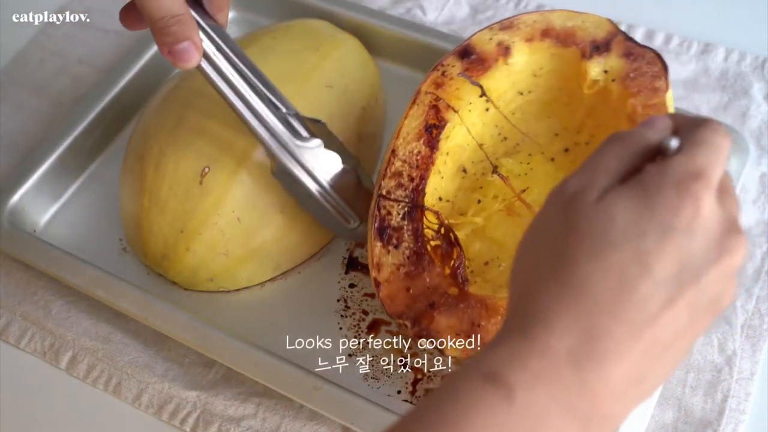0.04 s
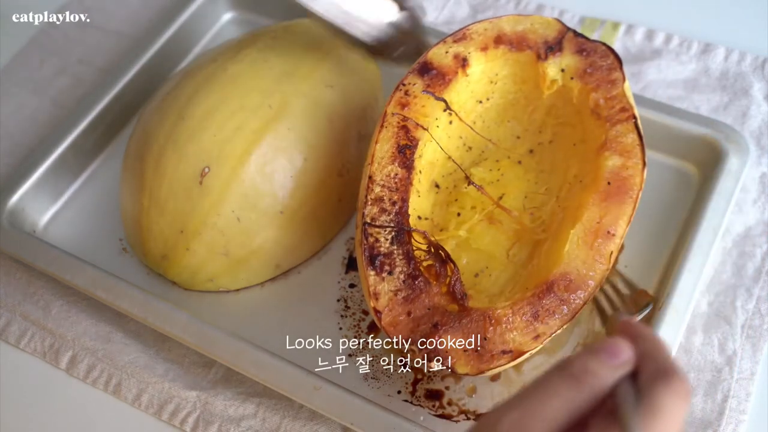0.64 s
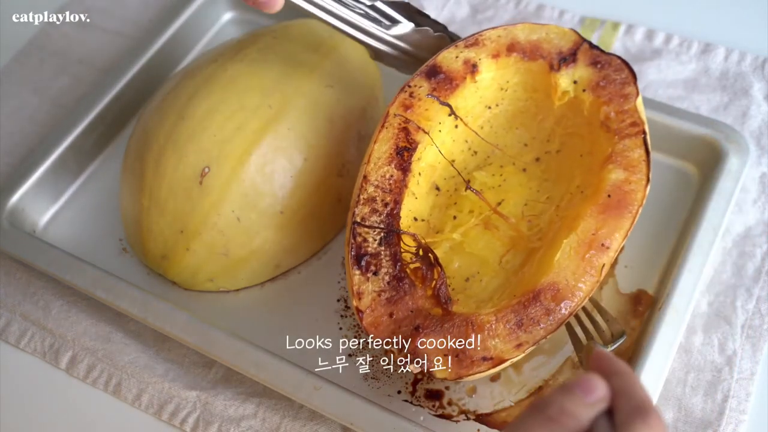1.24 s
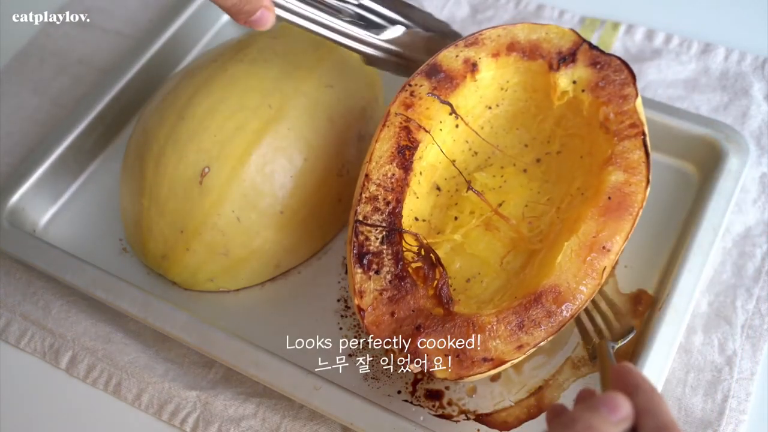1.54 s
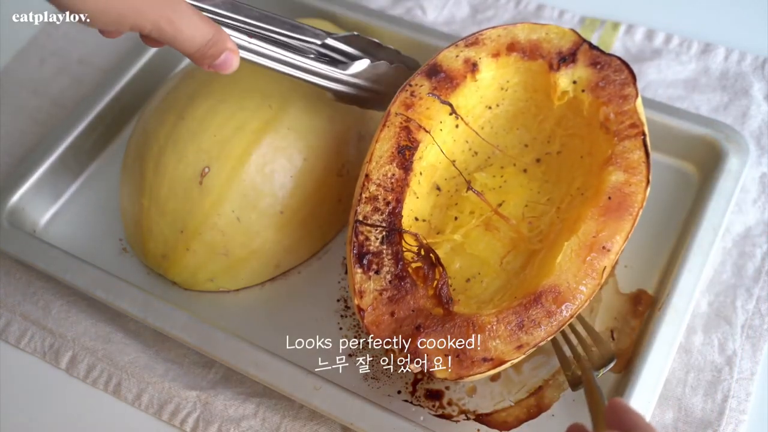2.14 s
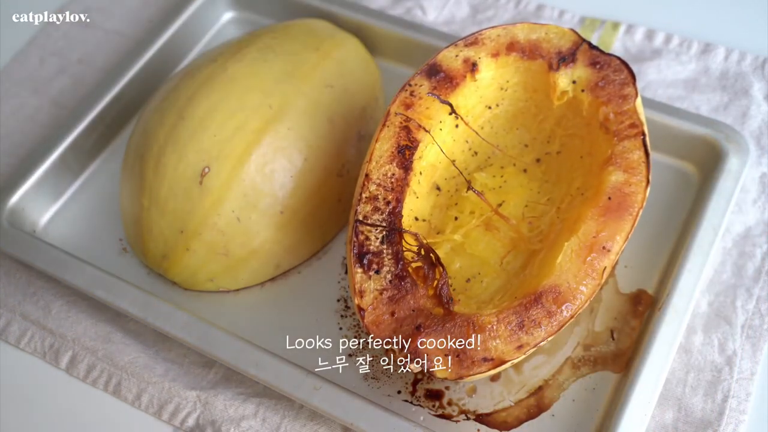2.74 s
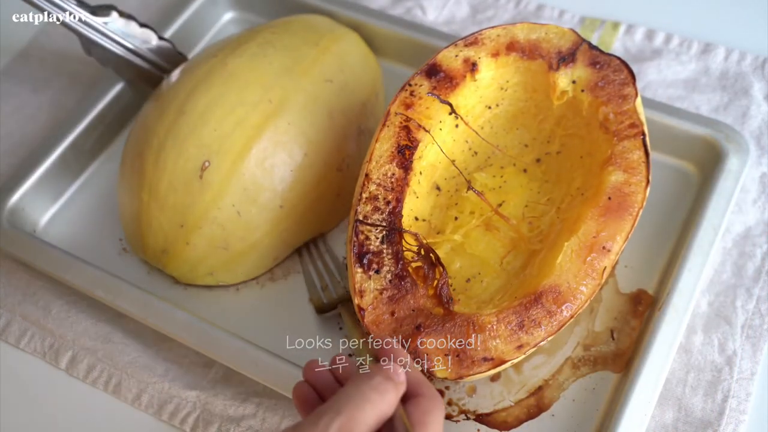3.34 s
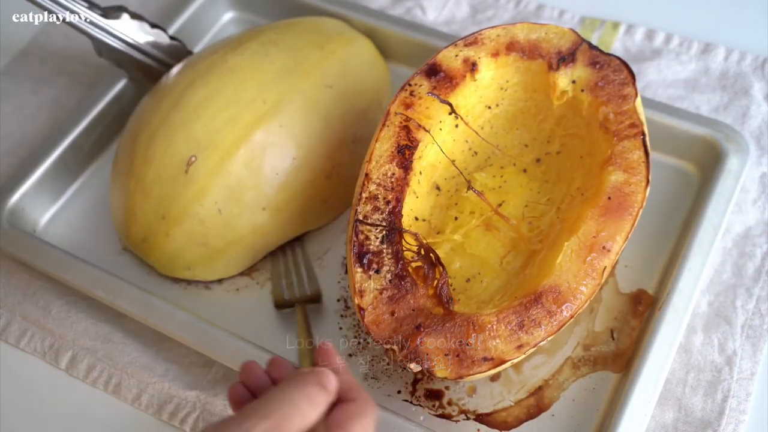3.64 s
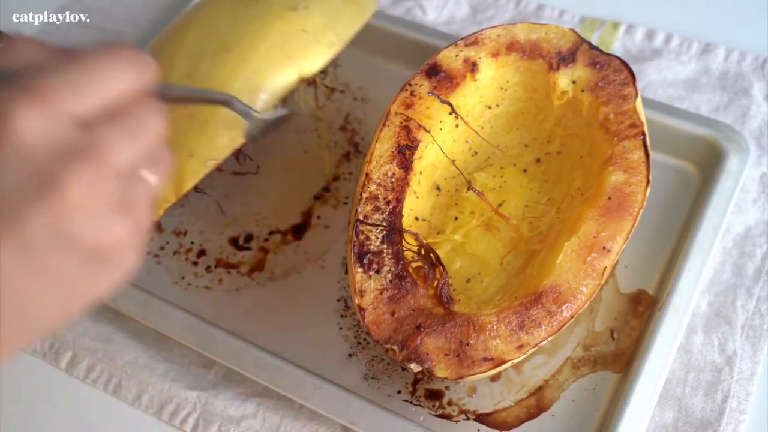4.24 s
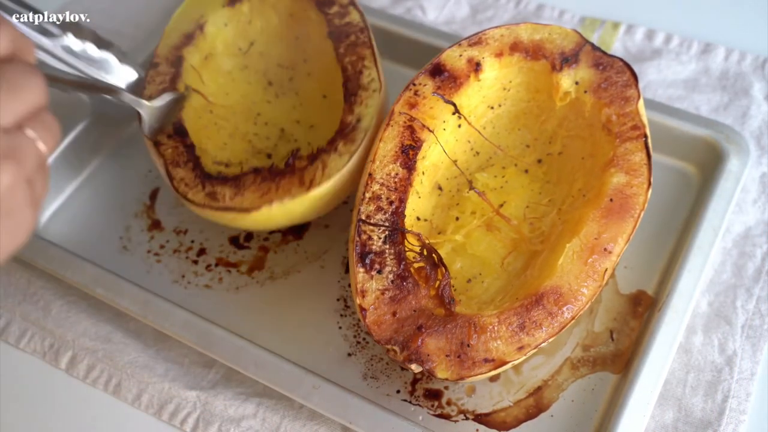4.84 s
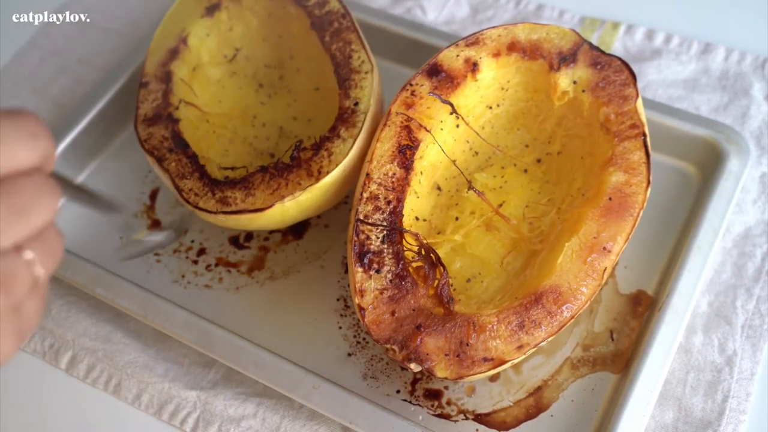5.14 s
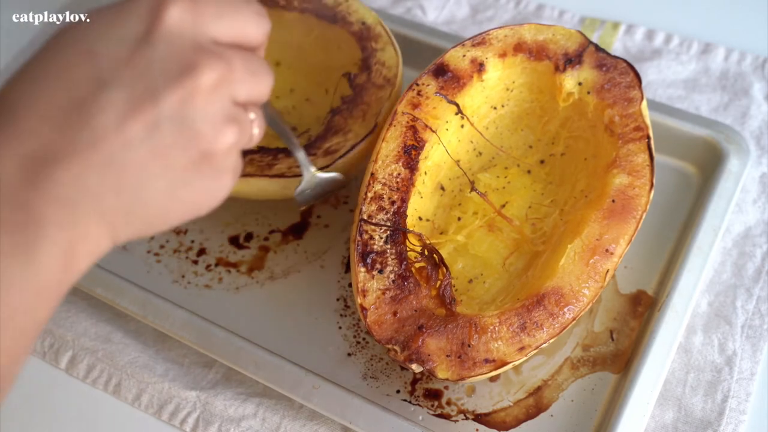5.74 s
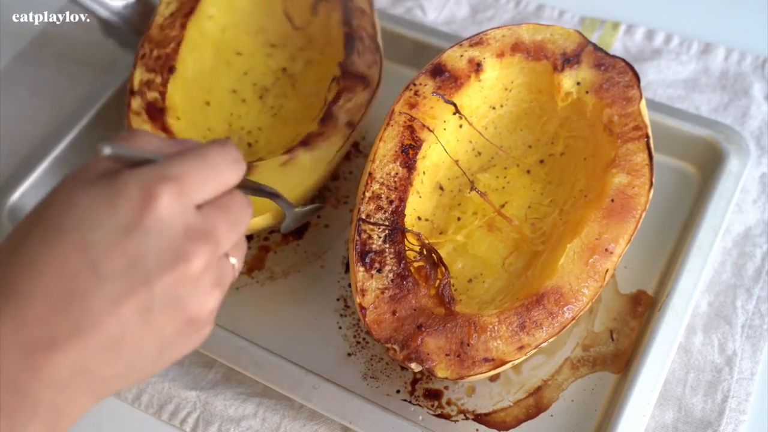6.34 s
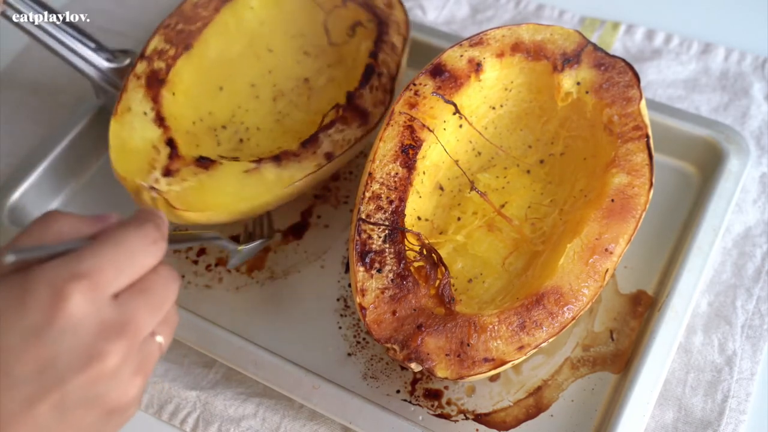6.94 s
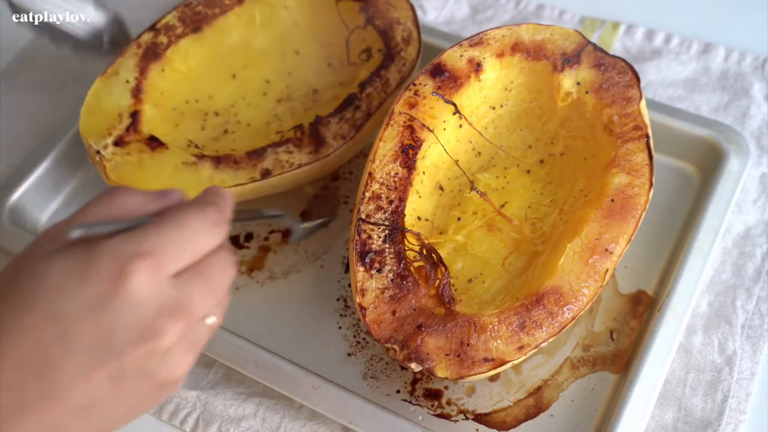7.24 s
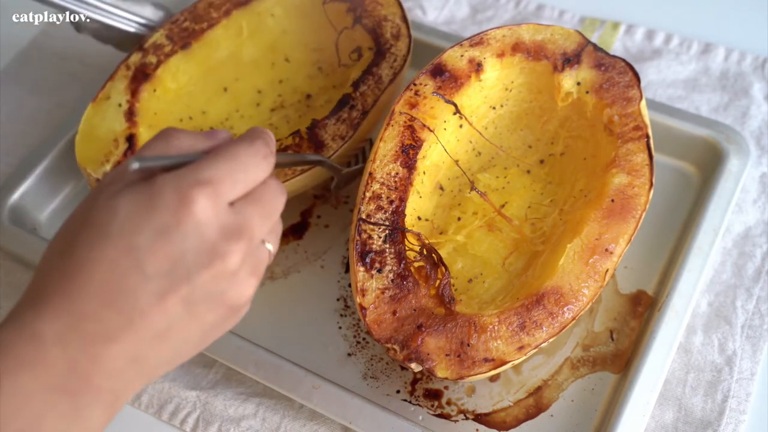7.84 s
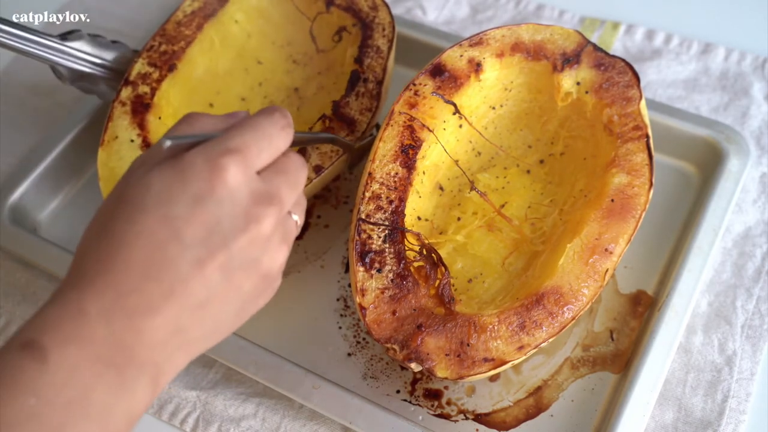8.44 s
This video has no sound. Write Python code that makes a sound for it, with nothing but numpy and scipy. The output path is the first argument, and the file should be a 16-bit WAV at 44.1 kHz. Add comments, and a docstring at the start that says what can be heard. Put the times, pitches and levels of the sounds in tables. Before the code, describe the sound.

Steel tongs and a fork click, clank and scrape on a metal baking tray as a wet roasted squash half is flipped.

```python
"""Steel clicks, clanks and scrapes on a metal baking tray as roasted squash halves are turned over. Tongs click
and chirp, and drag across the tray in stick-slip jerks; a fork strikes the tray, skids and squeaks under load.
Each metal piece rings with a few clear modes over a dense, fast-dying clash. The wet squash slides with a
sticky fizz and flops over, thumping tray and table. A short kitchen echo follows the clatter, and a low room
rumble lies under it all."""
import sys
import numpy as np
from scipy import signal
from scipy.fft import rfft, irfft
from scipy.io import wavfile
from scipy.ndimage import uniform_filter1d

SR = 44100
rng = np.random.default_rng(int(sys.argv[2]) if len(sys.argv) > 2 else 0)


def bounce(signal):
    """Save signal as a 16-bit WAV file at the path given by the first command-line argument."""
    frames = np.transpose(np.atleast_2d(signal))
    limited = np.clip(frames, -1, 1)
    pcm = np.round(limited * 32767).astype(np.int16)
    wavfile.write(sys.argv[1], SR, pcm)


N = 379258
TIME = np.arange(N) / SR
RING_TIME = TIME[:SR // 2]


def from_db(db):
    """Decibels to gain."""
    return 10 ** (np.asarray(db) / 20)


def rms(x):
    """Root mean square."""
    return np.sqrt(np.mean(x ** 2) + 1e-20)


def unit_energy(x):
    """Scale a response so that it passes noise at unchanged level."""
    return x / np.linalg.norm(x)


def add(track, start_s, sound):
    """Mix a sound into the track at a time."""
    start = max(round(start_s * SR), 0)
    track[start:start + len(sound)] += sound[:N - start]


def decay(t60_s):
    """Envelope that falls 60 dB in t60_s."""
    return np.exp(-np.log(1000) * RING_TIME / t60_s)


def damped_sine(hz, t60_s):
    """One ringing mode."""
    return np.sin(2 * np.pi * hz * RING_TIME) * decay(t60_s)


def movement(start_s, swell_s, hold_s, release_s, curve=1.84):
    """Envelope of one smooth gesture."""
    end_s = start_s + swell_s + hold_s + release_s
    ramps = np.minimum((TIME - start_s) / swell_s, (end_s - TIME) / release_s)
    return np.clip(ramps, 0, 1) ** curve


def shaped(x, spectrum):
    """Colour a noise with an EQ curve; rms 1."""
    hz, db = np.transpose(spectrum)
    bins = np.maximum(np.fft.rfftfreq(len(x), 1 / SR), 1)
    gain = from_db(np.interp(np.log(bins), np.log(hz), db))
    coloured = irfft(rfft(x) * gain, len(x))
    return coloured / rms(coloured)


def whitened(x):
    """Keep the timing of a burst but spread its energy evenly over all pitches."""
    return irfft(np.exp(1j * np.angle(rfft(x))), len(x))


def emphasis(x, db, hz, kind):
    """Boost or cut one region of the spectrum."""
    b, a = signal.butter(1, hz, kind, fs=SR)
    boost = a + (from_db(abs(db)) - 1) * b
    return signal.lfilter(boost, a, x) if db > 0 else signal.lfilter(a, boost, x)


def narrow_noise(hz, width_hz):
    """Noise in one narrow resonance; rms 1."""
    bins = np.fft.rfftfreq(N, 1 / SR)
    band = irfft(rfft(rng.standard_normal(N)) / (1 + ((bins - hz) / width_hz) ** 2), N)
    return band / rms(band)


def wander(samples):
    """Random drift: noise smoothed over so many samples; rms 1."""
    drift = uniform_filter1d(rng.standard_normal(len(RING_TIME)), size=samples)
    return drift / rms(drift)


def slips(size, per_s, spread_db):
    """Stick-slip friction: tiny jerks of random time, size and sign; rms 1."""
    signs = rng.choice([-1, 1], size)
    strengths = from_db(spread_db * np.minimum(rng.exponential(1, size), 4))
    jerks = signs * strengths * (rng.random(size) < per_s / SR)
    return jerks / rms(jerks)


def metal_body(modes, clash_eq, clash_db, clash_t60_s):
    """Impulse response of a metal piece: clear modes over a clash, a crowd of fast-dying ones."""
    ring = sum((-1) ** k * from_db(db) * unit_energy(damped_sine(hz, t60_s))
               for k, (hz, db, t60_s) in enumerate(modes))
    fade = decay(clash_t60_s)
    clash = rng.standard_normal(len(RING_TIME)) * fade
    for _ in range(2):
        clash = shaped(whitened(clash), clash_eq) * np.minimum(10 * fade, 1)
    return unit_energy(unit_energy(ring) + from_db(clash_db) * unit_energy(clash))


def touch_colour(x, bass_db, middle_db, treble_db):
    """The place and hardness of a contact favour low, middle or high modes."""
    x = emphasis(x, bass_db, 950, "low")
    x = emphasis(x, middle_db, [1250, 1950], "band")
    return unit_energy(emphasis(x, treble_db, 5200, "high"))


def rubbed(response, length_s, swell_s, judder_db=0.2):
    """Rubbed metal: pressure builds, the edge catches and slips, then lifts off."""
    touching = np.clip((length_s - RING_TIME) / 0.0027 + 1, 0, 1)
    pressure = np.clip(RING_TIME / swell_s, 0, 1) * touching
    catches = from_db(judder_db * wander(130))
    jerks = pressure * catches * slips(len(RING_TIME), per_s=3500, spread_db=1.0)
    force = whitened(jerks) * touching   # the jerks reach every mode alike
    ringing = signal.fftconvolve(force, response)[:len(response)]
    return unit_energy(ringing) * np.linalg.norm(pressure)


def strokes(rows, response, swell_share):
    """Short rubs that swell over a share of their length and break off."""
    out = np.zeros(N)
    for start_s, length_s, level_db, *treble_db in rows:
        spot = touch_colour(response, 0, 0, *treble_db) if treble_db else response
        add(out, start_s, from_db(level_db) * rubbed(spot, length_s, swell_share * length_s))
    return out


def contact(response, knock_db, skid_s, skid_db, favoured_hz, boost_db, *colour):
    """A knock that runs into a short skid, both coloured by the spot touched."""
    favoured = emphasis(response, boost_db, [favoured_hz * .92, favoured_hz / .92], "band")
    spot = touch_colour(favoured, *colour)
    knock = spot / rms(spot[:SR // 200])   # the first 5 ms set the level
    return from_db(knock_db) * knock + from_db(skid_db) * rubbed(spot, skid_s, swell_s=0.00032)


def dragged(curve, response, dull_hz, bright_hz, bright_db, judder_db, edge_s=0.00098, travel=0.27):
    """Steel catches and slips along the sheet; the echo from its edge shifts as the contact travels."""
    times_s, level_db, brightness_db = np.transpose(curve)
    t = times_s[0] + RING_TIME
    catches = from_db(judder_db * wander(130))
    path = uniform_filter1d(wander(4000), size=800)
    jerks = whitened(slips(len(t), per_s=3000, spread_db=3) * catches)
    echo_delay_s = edge_s * (1 + travel * path)
    jerks = jerks + 0.38 * np.interp(t - echo_delay_s, t, jerks)
    force = jerks / rms(jerks) * from_db(np.interp(t, times_s, level_db)) * (t < times_s[-1])
    bright_force = force * from_db(np.interp(t, times_s, brightness_db) + bright_db)
    dull_band = signal.butter(2, dull_hz, "band", fs=SR, output="sos")
    bright_band = signal.butter(3, bright_hz, "high", fs=SR, output="sos")
    dull = signal.fftconvolve(force, unit_energy(signal.sosfilt(dull_band, response)))
    bright = signal.fftconvolve(bright_force, unit_energy(signal.sosfilt(bright_band, response)))
    return dull + bright + from_db(-10) * signal.fftconvolve(force, response)


def room_tone(rumble_db=-41.5, hum_db=-49.5):
    """A bed of rumble with low resonances, thinning to faint hiss; a low hum swells briefly."""
    # Colour of the rumble: frequency_hz, gain_db
    rumble_eq = [(12, -50), (20, -15.5), (58, 2.5), (98, -6), (216, -14.5), (248, -13.5), (337, -29.5),
                 (434, -22.5), (472, -28), (607, -26.5), (660, -26.5), (2460, -42.5), (2910, -46),
                 (3840, -47.5), (16000, -51)]
    # Low resonances in it: pitch_hz, width_hz, level_db
    resonances = [(28, 3, -54.5), (52, 11, -47.5), (80.4, 11, -55.5), (161.5, 39, -61.5), (262.7, 74, -57)]
    rumble = from_db(rumble_db) * shaped(rng.standard_normal(N), rumble_eq)
    drone = sum(from_db(db) * narrow_noise(hz, width_hz) for hz, width_hz, db in resonances)
    swell = movement(start_s=0.77, swell_s=0.21, hold_s=0.51, release_s=0.31)
    hum = from_db(hum_db) * swell * narrow_noise(hz=161, width_hz=12)
    return rumble + drone + hum


def kitchen_echo(x, t60_s=0.35, build_s=0.0075):
    """Diffuse reflections that build up quickly and die away."""
    # Colour of the reflections: frequency_hz, gain_db
    echo_eq = [(100, 0.5), (1000, -2), (4500, -2.5), (9000, -3.5), (16000, -8.5)]
    envelope = decay(t60_s) * (1 - np.exp(-RING_TIME / build_s))
    tail = shaped(rng.standard_normal(len(RING_TIME)), echo_eq) * envelope
    return signal.fftconvolve(x, unit_energy(tail))[:N]


def squash_sliding(waver_db=1.0):
    """The cut face rubs unevenly over the tray while the sticky juice tears in tiny bursts."""
    # Shoves that gather speed, glide and stop: start_s, swell_s, glide_s, release_s, rub_db, fizz_db
    shoves = [(-.2, 0.36, 0.14, .08, -53.5, -64), (2.951, 0.062, 0.015, 0.11, -45, -55.5),
              (3.08, 0.062, 0.079, 0.1, -45, -53), (3.24, 0.086, 0.19, 0.093, -57.5, -66.5),
              (3.488, 0.14, 0.017, .14, -33.5, -40), (3.74, 0.15, .04, 0.046, -40.5, -52.5),
              (3.94, 0.053, .19, 0.35, -38, -54.5), (4.331, 0.12, 0.25, 0.27, -47.5, -46),
              (5.48, 0.16, 0.13, 0.66, -53.5, -63), (6.0, 0.19, 0.11, 0.064, -55, -70)]
    # Colours of the rub and the wet fizz: frequency_hz, gain_db
    rub_eq = [(150, -20), (350, -1), (600, 2), (1400, 4.5), (2200, 0), (3200, -3), (4600, -5), (6500, -26),
              (10000, -25.5)]
    fizz_eq = [(2500, -41), (5000, -0.5), (7000, -3), (10000, -7.5), (16000, -6)]
    rub = shaped(slips(N, per_s=3000, spread_db=2.0), rub_eq)
    fizz = shaped(slips(N, per_s=4000, spread_db=4.0), fizz_eq)
    grip = from_db(waver_db * narrow_noise(hz=0, width_hz=37))
    return grip * sum(movement(*timing) * (from_db(rub_db) * rub + from_db(fizz_db) * fizz)
                      for *timing, rub_db, fizz_db in shoves)


def squash_thumps(octave_off_db=-14, attack_s=0.0041):
    """The soft, heavy half shakes tray and table, most of all the modes near its landing's pitch."""
    # The squash lands and rocks, lower in pitch when softer: start_s, strength_db, pitch_hz
    landings = [(4.641, -11, 73.2), (4.694, -20.5, 26.2), (5.442, -28.5, 26.5), (5.675, -28.5, 44.7),
                (5.714, -34, 27), (7.071, -28, 48.3), (7.56, -23.5, 120)]
    # Tray and table under its weight: pitch_hz, gain_db, t60_s
    table_modes = [(27.4, 2.5, 0.23), (45.5, 2, 0.35), (109, 1, 0.11), (166, 6, 0.059)]
    attack = 1 - np.exp(-RING_TIME / attack_s)
    out = np.zeros(N)
    for start_s, strength_db, pitch_hz in landings:
        for hz, mode_db, t60_s in table_modes:
            gain = from_db(strength_db + mode_db + octave_off_db * np.log2(hz / pitch_hz) ** 2)
            add(out, start_s, gain * damped_sine(hz, t60_s) * attack)
    return out


def tongs(bass_db=-7, middle_db=-6, skid_s=0.0034, skid_below_db=4):
    """The steel arms click and rub on the rind; their joint chirps thinly as they flex."""
    # The arms' short clack and faint ring, and the joint's modes: pitch_hz, energy_db, t60_s
    arm_modes = [(1110, -3, 0.037), (2297, 8, 0.018), (2240, -12, .07), (2745, -7, 0.053), (3883, 6, 0.014),
                 (3880, -6, .12), (4350, -9, 0.017), (5010, -2, 0.022), (5000, -9, .11), (6920, -16, 0.026),
                 (8250, -9, 0.043)]
    joint_modes = [(3800, -7, 0.087), (7740, -5, 0.026), (9100, -3, .03), (11800, 1, .015)]
    # Colour of their clash: frequency_hz, gain_db
    clash_eq = [(300, -57), (1000, 19.5), (1500, 11.5), (2300, 6), (3000, -9), (4000, 3.5), (5800, -2),
                (8000, -6.5), (10000, -13.5), (16000, -18)]
    # Rubs on the rind and chirps of the joint: start_s, length_s, level_db
    rubs = [(1.36, 0.33, -68), (4.91, 0.072, -60.5), (7.77, 0.14, -61), (8.02, 0.16, -64.5)]
    chirps = [(.643, 0.015, -57.5), (.722, 0.016, -56.5), (.775, .023, -60.5), (5.89, 0.24, -63),
              (6.155, 0.14, -57.5)]
    # Clicks of the arms: start_s, level_db, favoured_hz, boost_db, treble_db
    clicks = [(.3617, -56, 3700, 5, 13), (0.8899, -30.5, 2340, 9.5, 4), (2.678, -56, 4400, 10, 3),
              (2.7346, -49, 4300, 5, -7), (2.8710, -46.5, 2750, 17, -7), (4.8855, -48, 3050, 9, -16),
              (5.4, -47, 1950, 11, 14), (5.4432, -30.5, 4860, 1.5, 7.5), (7.5212, -27.5, 2480, 13, 18),
              (7.561, -30, 3700, -2.5, 9), (7.7005, -54.5, 4000, -11, 6), (8.34, -57, 2400, 3.5, 10.5)]
    arms = metal_body(arm_modes, clash_eq, clash_db=2, clash_t60_s=0.02)
    joint = metal_body(joint_modes, clash_eq, clash_db=3.5, clash_t60_s=.012)
    out = strokes(rubs, arms, swell_share=.25) + strokes(chirps, joint, swell_share=0.13)
    for start_s, level_db, favoured_hz, boost_db, treble_db in clicks:
        click = contact(arms, level_db, skid_s, level_db - skid_below_db,
                        favoured_hz, boost_db, bass_db, middle_db, treble_db)
        add(out, start_s, click)
    return out


def tray(pressed_ring_share=0.43):
    """The sheet is knocked and scraped; it rings shorter under the pressing tongs."""
    # Modes of the sheet: pitch_hz, energy_db, t60_s
    modes = [(430, -21, .1), (720, -16, .08), (942, -11, .1), (1070, -11, .06), (1315, -7, .1),
             (1430, -8, .08), (1541, 0, .14), (1692, -3, .1), (1860, -2, .11), (2020, -8, .08),
             (2159, -3, .09), (2328, -4, .11), (2405, -5, .12), (2457, -6, .12), (2559, -2, .14),
             (2720, -7, .1), (2949, -6, .08), (3161, -8, .09), (3850, -10, .12), (4400, -12, .07),
             (4920, -9, .05), (5860, -15, .07), (6730, -13, .06), (7300, -16, .04), (9100, -19, .07)]
    # Colour of its clash: frequency_hz, gain_db
    clash_eq = [(150, -34.5), (380, -0.5), (560, -8), (800, 0.5), (1500, 4.5), (2100, -2.5), (2700, -3),
                (3500, -0.5), (5000, -7), (6000, -16.5), (7500, -19.5), (10000, -26.5), (16000, -29.5)]
    # Knocks: start_s, knock_db, skid_s, skid_db, favoured_hz, boost_db, bass_db, middle_db, treble_db
    knocks = [(0.865, -37.5, .002, -56, 4400, 1, 6, -1, 8),
              (1.9263, -43, 0.00063, -38.5, 1030, 20, 3, -2, 25),
              (3.6278, -17.5, 0.0022, -36, 417, 10.5, 4, -24.5, 7),
              (4.0074, -11.5, .002, -22, 2810, 5.6, 2, 11, 11.5),
              (5.6734, -41, 0.02, -45, 1010, 12.5, 10, -1, 9),
              (6.663, -35, 0.0072, -36, 3800, -7, 11, -1, 17),
              (6.6690, -34, 0.0064, -25, 3960, 6, -2.5, -4, 1.5),
              (7.0119, -27, 0.0127, -26, 990, 6, -2.5, 5, 7)]
    # The tongs drag to flip the squash, later to push it: time_s, relative_level_db, brightness_db
    flip_drag = [(4.016, -20, -8), (4.022, -21, -5.5), (4.18, -26, 1.5), (4.21, -33.5, -6),
                 (4.25, -48, 2.5)]
    push_drag = [(6.69, -39, -12), (6.708, -39, -6), (6.724, -23, -8.5), (6.76, -32.5, -12),
                 (6.78, -23, -9.5), (6.822, -38.5, -10), (6.844, -21, -10), (6.882, -18, -5),
                 (6.936, -25, -3.5), (6.946, -22, -2), (6.975, -37, -16)]
    pressed_modes = [(hz, db, t60_s * pressed_ring_share) for hz, db, t60_s in modes]
    pressed = metal_body(pressed_modes, clash_eq, clash_db=4, clash_t60_s=.018)
    struck = metal_body(modes, clash_eq, clash_db=10, clash_t60_s=.012)
    out = np.zeros(N)
    for start_s, *blow in knocks:
        add(out, start_s, contact(struck, *blow))
    flip = dragged(flip_drag, pressed, dull_hz=(1150, 3200), bright_hz=5000, bright_db=1.5, judder_db=-1)
    push = dragged(push_drag, pressed, dull_hz=(1310, 2950), bright_hz=4120, bright_db=1, judder_db=2.2)
    add(out, flip_drag[0][0], from_db(-5.0) * flip)
    add(out, push_drag[0][0], from_db(-1.5) * push)
    return out


def fork():
    """The fork clanks on the tray, skids on its tine tips and squeaks under load."""
    # Modes of the whole fork, the tines and the loaded tines: pitch_hz, energy_db, t60_s
    fork_modes = [(430, -20, .08), (735, -17, .08), (900, -9, .04), (945, -4, .13), (1090, -11, .06),
                  (1345, -8, .07), (1470, -12, .07), (2560, -8, .1), (2850, -8, .07), (3030, -7, .05),
                  (3165, -6, .07), (3677, -13, .1), (4054, -11, .08), (4400, -11, .06), (4900, -8, .06),
                  (5630, -17, .07), (6250, -16, .05), (8100, -17, .055)]
    tine_modes = [(930, -5, 0.11), (1320, -13, 0.078), (1434, 4, 0.029), (1370, -9, 0.12),
                  (1690, -3.5, .09), (2230, -7, 0.046), (2430, -6.5, 0.12), (3750, 1.5, 0.13),
                  (4520, -1, 0.1), (5130, -22.5, 0.11), (5300, -46.5, .06), (6600, 3.5, 0.042),
                  (8400, -1.5, 0.07), (9560, 0.5, .04)]
    squeak_modes = [(596, -9.5, .04), (990, -2, .06), (1220, -5.5, 0.015), (2900, -8, .03),
                    (5260, -4, .025), (7070, -5.5, .016), (10900, -9, .006)]
    # Clash colours of fork and tines: frequency_hz, gain_db
    fork_clash_eq = [(150, -17), (340, -15.5), (520, -5), (680, -12.5), (950, 2.5), (1400, 1),
                     (1700, -12.5), (2100, -12), (2600, 4.5), (3200, -2.5), (4700, -0.5), (5600, -8.5),
                     (8000, -8), (10500, -17.5), (16000, -15.5)]
    tine_clash_eq = [(200, -28.5), (800, -8.5), (1300, 1), (2000, -10.5), (2500, 3), (3000, -6), (4500, 3),
                     (7000, -4), (11000, -9), (16000, -8)]
    # Short rubs on rind and tray: start_s, length_s, level_db, treble_db
    rubs = [(4.298, 0.041, -34, -1), (4.57, 0.1, -39.5, 4), (4.675, 0.079, -36, -4),
            (6.157, 0.02, -46.5, 10), (6.300, 0.0154, -46, -4), (6.533, 0.027, -40, -4),
            (7.036, 0.0087, -37, -3)]
    # Tines squeak as they lever the squash up: start_s, length_s, level_db
    squeaks = [(3.893, 0.035, -35.5), (3.951, 0.074, -29), (3.969, 0.008, -24)]
    # Clanks: start_s, knock_db, skid_s, skid_db, favoured_hz, boost_db,
    # bass_db, middle_db, treble_db, tip_share (0-1, the part taken by the tine tips)
    clanks = [(3.1760, -21.5, 0.0037, -48, 5370, 9.5, 19, 10, 7, 0.44),
              (3.2030, -20.5, 0.0051, -31.5, 5030, 7.4, 13, 2.5, -22.5, 0.92),
              (4.4955, -16.5, 0.011, -18.5, 3060, 6, -0.5, -2.5, -9.5, 0.2),
              (6.0585, -25.5, 0.021, -25, 1750, 15.5, 2.5, -3, -4, 1),
              (6.3775, -23.5, 0.014, -22, 883, 10, 2.5, -2, 6.5, 0.07),
              (6.4622, -22, 0.00085, -17.5, 960, 12, 1.5, -4, -1, 0.2),
              (6.4980, -24.5, .003, -47, 4300, 3, 11, 5, 7, 0.03),
              (7.1770, -20.5, 0.035, -27, 920, 4.5, 2, -6, -1, 0.27),
              (7.2535, -25, .023, -23, 6720, -0.5, 6.5, 14, 10.5, 1)]
    whole = metal_body(fork_modes, fork_clash_eq, clash_db=2.0, clash_t60_s=0.018)
    tines = metal_body(tine_modes, tine_clash_eq, clash_db=4.5, clash_t60_s=0.031)
    loaded_tines = metal_body(squeak_modes, tine_clash_eq, clash_db=-5.5, clash_t60_s=0.006)
    rubbing = touch_colour(whole, bass_db=-8, middle_db=3.5, treble_db=-4.5)
    out = strokes(rubs, rubbing, swell_share=0.35) + strokes(squeaks, loaded_tines, swell_share=.025)
    for start_s, *blow, tip_share in clanks:
        response = (1 - tip_share) * whole + tip_share * tines
        add(out, start_s, contact(response, *blow))
    return out


def scene(echo_db=-13):
    """Close, mono clatter and sliding with a little echo, over dry thumps and the room tone."""
    near = tray() + fork() + tongs() + squash_sliding()
    return (near + from_db(echo_db) * kitchen_echo(near) + squash_thumps() + room_tone())[None]


def record(dry, cutoff_hz=16100):
    """A steep low-pass takes off the very top."""
    return signal.sosfilt(signal.ellip(12, .1, 80, cutoff_hz, fs=SR, output="sos"), dry)


dry = scene()
out = record(dry)
bounce(out)
```